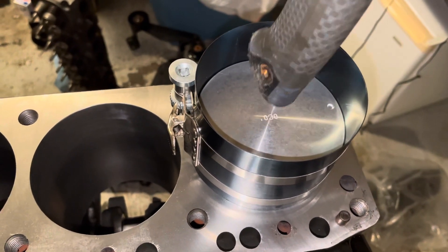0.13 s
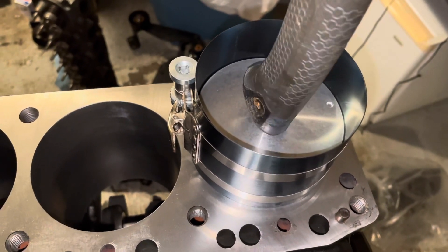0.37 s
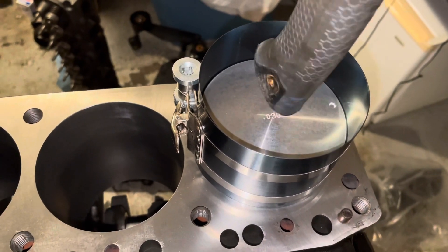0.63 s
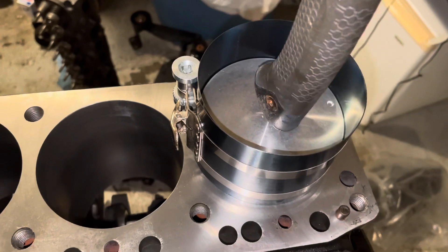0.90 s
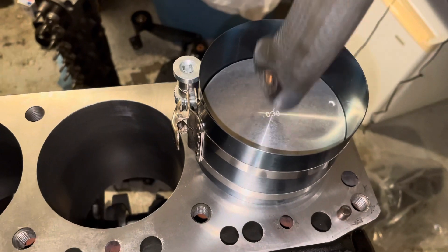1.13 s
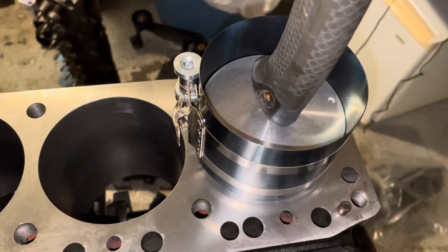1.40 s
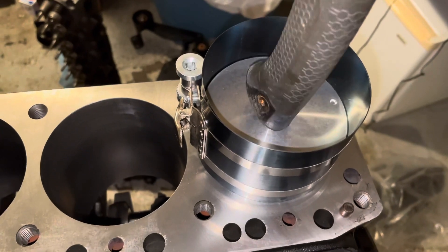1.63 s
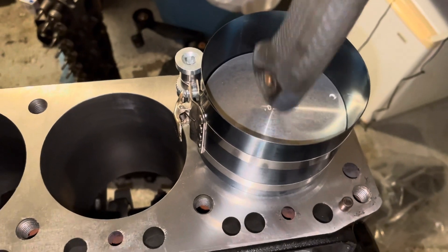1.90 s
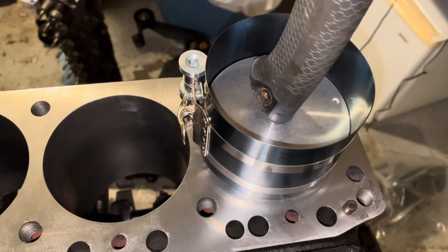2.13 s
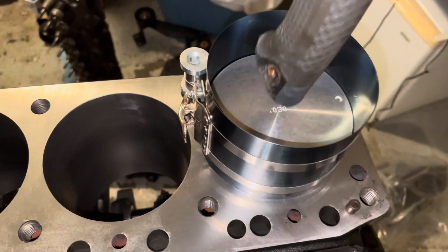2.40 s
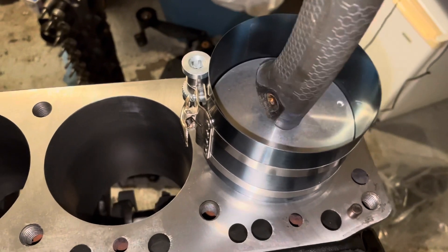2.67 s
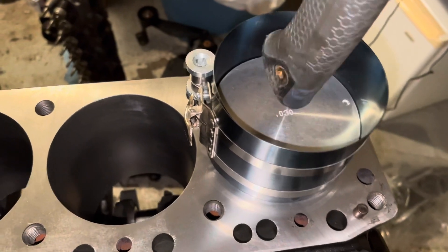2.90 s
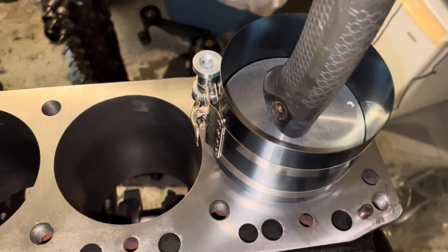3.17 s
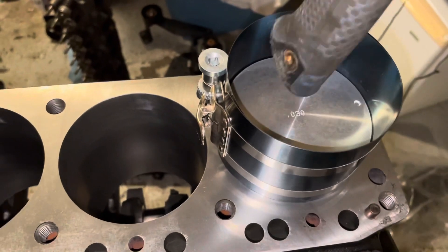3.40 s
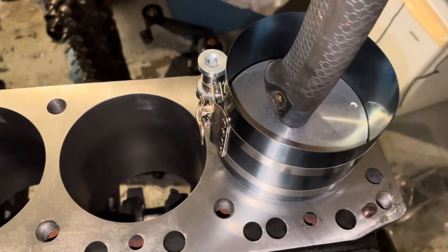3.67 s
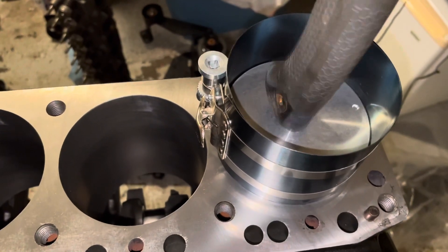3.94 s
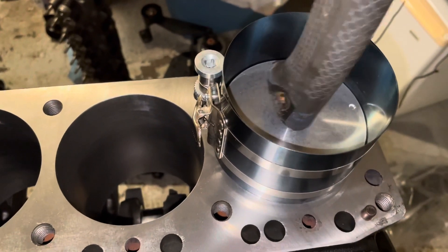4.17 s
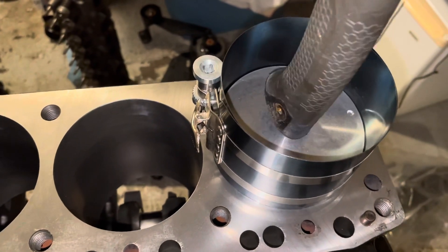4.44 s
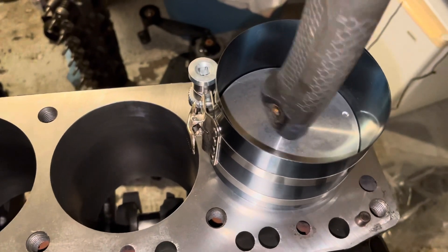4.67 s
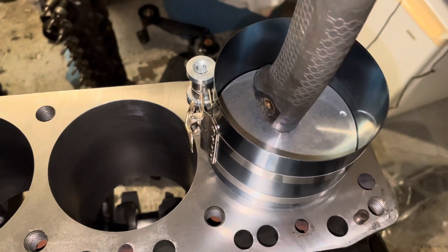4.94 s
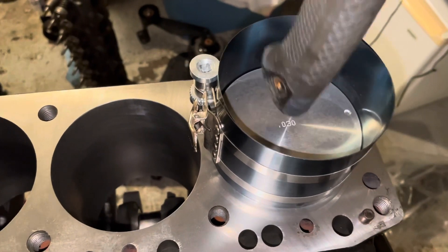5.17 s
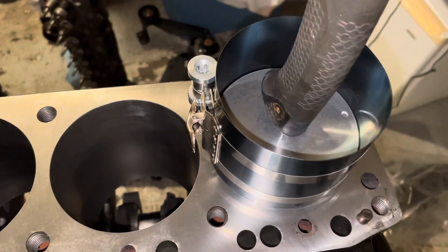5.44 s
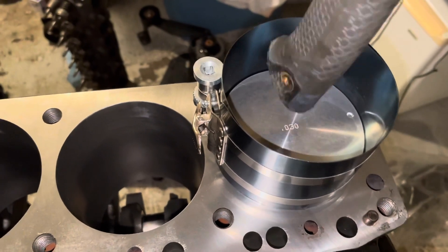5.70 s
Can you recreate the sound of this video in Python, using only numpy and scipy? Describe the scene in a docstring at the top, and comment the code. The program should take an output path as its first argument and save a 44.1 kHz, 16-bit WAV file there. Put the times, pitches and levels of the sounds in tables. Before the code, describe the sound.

Thirteen even, hard metallic clacks about half a second apart, with short scraping rattle, low thud and brief room echo over faint hum.

```python
"""Hard clacks with a gritty rattle and a dull thud just after, repeated in a workshop over a low hum.
A hammer handle taps a piston down through a steel ring sleeve into an engine block, close to a two-port microphone.
Crown, block and casting are damped modes; slipping rings are shaped noise that also rings the sleeve.
Echoes are decaying noise; rumble and air are filtered noise; a faint whine is a blurred gliding sine."""
import sys
import numpy as np
from scipy import signal
from scipy.fft import rfft, irfft, next_fast_len
from scipy.io import wavfile
from scipy.ndimage import uniform_filter1d, map_coordinates

SR = 44100
rng = np.random.default_rng(int(sys.argv[2]) if len(sys.argv) > 2 else 0)


def volts_from_decibels(level):
    """Turn decibel levels (scalar or array-like) into linear amplitude factors."""
    exponent = np.asarray(level, float) / 20
    return 10 ** exponent


def unload_audio(sound):
    """Save the sound as a 16-bit wav file, at the path given as the first command line argument."""
    columns = np.transpose(np.atleast_2d(sound))
    # keep every value between -1 and 1, then stretch to whole-number steps
    steps = np.round(np.clip(columns, -1, 1) * 32767)
    wavfile.write(sys.argv[1], SR, steps.astype(np.int16))


N = 256662


def unit(x):
    """Scale to rms 1."""
    return x / np.sqrt(np.mean(x ** 2) + 1e-20)


def along(points, hz):
    """Interpolate (frequency [Hz], value) points on a log frequency axis."""
    point_hz, value = np.transpose(points)
    return np.interp(np.log(hz + 1), np.log(point_hz + 1), value)


def filtered(x, response):
    """Multiply the spectrum of x by a (complex) response of frequency."""
    size = next_fast_len(x.shape[-1] + 8192)
    spectrum = rfft(x, size) * response(np.fft.rfftfreq(size, 1 / SR))
    return irfft(spectrum, size)[..., :x.shape[-1]]


def spread(pair, alike):
    """Mix two unrelated signals into left and right with a given correlation per frequency."""
    def angle(hz):
        return np.arccos(np.clip(along(alike, hz), -1, 1)) / 2

    mid, side = filtered(pair, lambda hz: np.array([np.cos(angle(hz)), np.sin(angle(hz))]))
    return np.array([mid + side, mid - side])


def wobble(knots_per_s):
    """Smooth random curve: a spline through normal knots."""
    knots = rng.standard_normal(int(N * knots_per_s / SR) + 4)
    return map_coordinates(knots, [np.arange(N) * knots_per_s / SR])


def patchy(spectrum, patchy_db):
    """Stereo noise of rms 1 with slowly moving time-frequency patches of gain."""
    # (frequency [Hz], left-right correlation [-1..1])
    noise_alike = [(60, 0.98), (180, 0.9), (550, 0.56), (1650, 0.029), (4970, 1), (15000, 0.34)]
    z = signal.stft(rng.standard_normal((2, N)), nperseg=1024)[2]
    field = uniform_filter1d(rng.standard_normal(z.shape[1:]), size=8, axis=0)
    field = uniform_filter1d(field, size=8, axis=1)
    pair = signal.istft(z * volts_from_decibels(patchy_db * unit(field)), nperseg=1024)[1][:, :N]
    colored = filtered(pair, lambda hz: volts_from_decibels(along(spectrum, hz)))
    return unit(spread(colored, noise_alike))


def hum():
    """Distant machinery rumbles unevenly and slowly grows; ventilation air fills the room."""
    # ventilation air: (frequency [Hz], relative density [dB/Hz])
    air_spectrum = [(60, -54.5), (130, -9.5), (250, -4), (400, -9), (630, -8.5), (1000, -5.5), (1400, -8),
                    (1750, -5.5), (2100, -12.5), (2600, -23), (4000, -33.5), (6000, -49.5), (9000, -69.5),
                    (16000, -100)]
    # machinery rumble: (frequency [Hz], relative density [dB/Hz])
    rumble_spectrum = [(15, -46.5), (28, -27.5), (40, -9.5), (52, -2), (65, -2), (80, -3.5), (105, -12),
                       (160, -13), (300, -29.5), (500, -70)]
    growth_db_per_s = 0.88
    rumble_db = -55 + growth_db_per_s * np.arange(N) / SR + 2 * wobble(3.9)
    air_db = -59 + 0.75 * wobble(2.5)
    rumble = volts_from_decibels(rumble_db) * patchy(rumble_spectrum, patchy_db=0.5)
    air = volts_from_decibels(air_db) * patchy(air_spectrum, patchy_db=0.5)
    return (rumble + air) * volts_from_decibels([[.8], [-.8]])  # left 1.6 dB up on right


def whine():
    """A faint far-off tone, blurred by phase drift, that dips, glides up and fades."""
    start_s, fade_s, length_s, turn_s = .33, .07, .4, .14  # turn counts from the start
    lowest_hz, glide_hz_per_s, blur_hz, gain_db = 3150, 1800, 150, -73.5
    t = np.arange(N) / SR - start_s
    drift = np.cumsum(rng.standard_normal((2, N)), axis=1) * np.sqrt(2 * np.pi * blur_hz / SR)
    glide_hz = lowest_hz + glide_hz_per_s * np.abs(t - turn_s)
    tone = np.sin(2 * np.pi * np.cumsum(glide_hz) / SR + drift)
    fade = np.clip(np.minimum(t, length_s - t) / fade_s, 0, 1) ** 2
    return filtered(tone, lambda hz: np.exp(-((hz - 3300) / 400) ** 2)) * volts_from_decibels(gain_db) * fade


def tail(t60s, levels, onset_s):
    """Stereo echo tail: noise dying at its own speed per frequency, the treble falling ever faster."""
    # (frequency [Hz], extra loss after fall_s [dB])
    extra_fall = [(500, 0), (1100, 2), (3000, 4), (7000, 8)]
    fall_s = .3
    hz, t, z = signal.stft(rng.standard_normal((2, SR // 2)), SR, nperseg=256)
    decay_db = -60 * t / along(t60s, hz)[:, None]
    extra_db = along(extra_fall, hz)[:, None] * (t / fall_s) ** 2
    noise = signal.istft(z * volts_from_decibels(decay_db - extra_db), SR, nperseg=256)[1]
    noise = noise * (1 - np.exp(-(np.arange(noise.shape[1]) / SR / onset_s) ** 2))
    return filtered(noise / np.linalg.norm(noise[0]), lambda hz: volts_from_decibels(along(levels, hz)))


def workshop():
    """One random echo pattern: near benches plus far walls, as two decaying noise tails."""
    # decay before the extra fall: (frequency [Hz], t60 [s])
    # the near point at 1100 Hz lies between STFT bins; the bins beside it die almost at once
    near_t60 = [(80, 0.33), (300, 0.61), (1100, -0.03), (3000, 0.3748), (10000, 0.28)]
    far_t60 = [(60, .25), (160, 0.79), (420, 0.44), (1100, 0.55), (2900, 0.5), (7700, 0.64), (13000, 0.4)]
    # (frequency [Hz], relative level [dB])
    near_db = [(60, -28.5), (150, -8), (330, -1), (520, -23), (800, -9), (1150, -14.5), (1700, -14),
               (2200, -14.5), (3000, -22.5), (4800, -21.5), (7000, -27.5), (11000, -36.5), (14500, -40)]
    far_db = [(60, -22.5), (150, -11), (330, 2.5), (520, -3.5), (800, -5.5), (1150, -2.5), (1700, -8.5),
              (2200, -9), (3000, -16.5), (4800, -25.5), (7000, -29.5), (11000, -32.5), (14500, -44)]
    # (frequency [Hz], left-right correlation [-1..1])
    echo_alike = [(60, .85), (130, 0.51), (290, 0.5), (640, .05), (1400, 0.096), (3100, 0.71), (6000, 0.45),
                  (12000, 0.62)]
    near = tail(near_t60, near_db, onset_s=0.002)
    far = tail(far_t60, far_db, onset_s=0.0046)
    return spread(near + far, echo_alike)


def tilt(db_per_octave):
    """Treble slope over the two octaves above 3500 Hz, level beyond."""
    return [(3500, 0), (14000, 2 * db_per_octave)]


def leaned(modes, rim_db):
    """Drive the crown rim's modes, those above 1900 Hz, harder or softer than the rest."""
    return [(hz, db + rim_db * (hz > 1900), *rest) for hz, db, *rest in modes]


def ring(modes, t, attack_s, scatter_db, detune, blur=0):
    """Damped modes set off at t = 0, varied per call; blur is phase-drift linewidth as a share of frequency."""
    t = np.maximum(t, 0)
    hz, db, t60, swing = np.transpose(modes)[:, :, None]
    level_chance, pitch_chance = rng.standard_normal((2, len(modes), 1))
    drift = np.cumsum(rng.standard_normal((len(modes), len(t))), axis=1)
    drift = drift * np.sqrt(2 * np.pi * blur * hz / SR)
    envelope = swing * volts_from_decibels(db + scatter_db * level_chance - 60 * t / t60)
    waves = envelope * np.sin(2 * np.pi * hz * (1 + detune * pitch_chance) * t + drift)
    return waves.sum(0) * (1 - np.exp(-t / attack_s))


def casting_hum(t, rim_db):
    """Bore air and casting modes hum on after the blow, blurred by phase drift."""
    # (frequency [Hz], level [dB], t60 [s], first swing [signed factor])
    casting_modes = [(258, -29, .25, 1), (305, -28, .32, -1), (353, -25, .36, 1), (388, -27, .22, -1),
                     (645, -34, .12, 1), (730, -34, .2, 1), (810, -33, .15, -1), (915, -38, .35, -1),
                     (1045, -35, .3, 1), (1135, -32, .15, -1), (1335, -37, .3, 1), (1534, -35, .3, -1),
                     (2170, -38, .15, 1), (2370, -42, .25, -1), (3560, -47, .42, 1), (4900, -51, .35, -1)]
    return ring(leaned(casting_modes, rim_db), t, .004, scatter_db=2.5, detune=.006, blur=.012)


def block_thud(t):
    """Engine block and stand modes, set off late because the push takes time to reach the block."""
    # (frequency [Hz], level [dB], t60 [s], first swing [signed factor])
    block_modes = [(69, -24.5, 0.17, 0.78), (88.7, -24, 0.12, 0.98), (143.5, -14, 0.062, -1.34),
                   (266.7, -6, 0.045, 0.86), (369, -6, 0.024, -0.84)]
    delay_s = .0024
    return ring(block_modes, t - delay_s, .0002, scatter_db=1, detune=.015)


def chatter(t, peak_s, life_s, tilt_db):
    """Rings slip in the sleeve: gritty noise swells, dies and sets the steel modes ringing."""
    # hiss of slipping rings: (frequency [Hz], relative density [dB/Hz])
    slip_spectrum = [(1200, -30), (2500, -3), (4500, 0), (7000, -2), (8500, -4), (11000, -5), (13000, -10),
                     (14300, -17), (15500, -8), (16500, -10), (17200, -60)]
    # steel sleeve: (frequency [Hz], level [dB], t60 [s])
    sleeve_modes = [(2190, -2, .04), (2850, -13, .035), (3525, -9, .035), (4210, -11, .03),
                    (4800, -11, .035), (5880, -15, .025), (6750, -13, .018), (11000, -13, .012)]
    u = t / peak_s
    swell = (u * np.exp(1 - u)) ** 2 + .5 * np.exp(-t / life_s)
    roughness = uniform_filter1d(rng.standard_normal(len(t)), size=9)
    grit = rng.standard_normal(len(t)) * volts_from_decibels(14 * roughness)
    hiss = unit(filtered(grit, lambda hz: volts_from_decibels(along(slip_spectrum, hz)))) * swell
    steel = sum(volts_from_decibels(db - 60 * t / t60) * np.sin(2 * np.pi * hz * t) for hz, db, t60 in sleeve_modes)
    burst = hiss + volts_from_decibels(-25.5) * signal.fftconvolve(grit * swell, steel)[:len(t)]
    return filtered(burst, lambda hz: volts_from_decibels(along(tilt(tilt_db), hz)))


def crown_clack(t, rim_db):
    """Piston crown modes struck by the handle."""
    # (frequency [Hz], level [dB], t60 [s], first swing [signed factor])
    crown_modes = [(782, -5, 0.011, -0.94), (1160, -7, 0.019, 1), (1325, 1.5, 0.0069, 0.99),
                   (2201, -8, 0.0088, -1.23), (1506, -18, .04, 0.52)]
    return ring(leaned(crown_modes, rim_db), t, .0009, scatter_db=1.5, detune=.02)


def knocks():
    """Every blow, direct and echoed; echoes are partly the same each time, as hand and hammer shift."""
    # blows; off-centre ones ring the crown rim more:
    # (time [s], strength [dB], chatter [dB], brightness [dB/octave], crown rim [dB])
    blows = [(.1390, -1.5, -25.5, -3, 3), (0.6403, 0, -23, -2.5, -4), (1.096, 0, -19.5, -3.5, 3),
             (1.5524, 1, -22.5, -0.9, -2), (2.0099, 0.5, -19.5, 0.6, 4.5), (2.4610, 0, -20.5, -0.5, 1.5),
             (2.9179, 0.5, -19, -1.7, 1.5), (3.4011, 1, -19.5, -0.55, 2), (3.862, 1, -25, 3.06, -1.5),
             (4.3455, 1, -22.5, 1.15, -1.5), (4.8119, 0, -25, 2.5, -4), (5.244, 1, -22, 4, -4.5),
             (5.7136, -1, -19, -5, 3)]
    # loose ticks of the sleeve: (time [s], level [dB])
    ticks = [(5.2562, -11)]
    # single strong echoes of the clack off nearby faces: (mean delay [ms], left [dB], right [dB])
    faces = [(4.4, -10.5, -12), (7.7, -6, -18), (11.5, -22.5, -17.5), (19.3, -15, -18.5)]
    # the block takes less of the blow until the rings grip the bore
    loose_db, grip_s, grip_spread_s = -3.5, 1.4, .3
    slip_peak_s, slip_scatter = .0026, 0.1  # scatter in log time
    same = 0.41  # power share of the echo pattern common to all blows
    out = np.zeros((2, N + SR))
    t = np.arange(SR // 2) / SR
    walls = workshop()

    for s, db in ticks:
        out[:, round(s * SR):][:, :len(t)] += volts_from_decibels(db) * chatter(t, .0003, .0006, 1.5)

    for s, clack_db, chatter_db, tilt_db, rim_db in blows:
        thud_db = clack_db + loose_db / (1 + np.exp((s - grip_s) / grip_spread_s))
        peak_s = slip_peak_s * np.exp(slip_scatter * rng.standard_normal())
        clack = volts_from_decibels(clack_db) * crown_clack(t, rim_db)
        thud = volts_from_decibels(thud_db) * block_thud(t)
        after = volts_from_decibels(thud_db) * casting_hum(t, rim_db)
        slip = volts_from_decibels(chatter_db) * chatter(t, peak_s, .004, tilt_db)
        direct = clack + thud + after + slip

        # the walls answer each range as strongly as its source was driven
        drive = [(400, thud_db), (700, clack_db), (1800, clack_db),
                 (2200, clack_db + rim_db / 2), (3200, chatter_db + 24)]
        echoes = np.sqrt(same) * walls + np.sqrt(1 - same) * workshop()
        echoes = filtered(echoes, lambda hz: volts_from_decibels(along(drive, hz) + along(tilt(tilt_db), hz)))

        for ms, left_db, right_db in faces:
            late = round((s + (ms + rng.normal(0, 0.27)) / 1000) * SR)
            out[:, late:late + len(t)] += volts_from_decibels([[left_db], [right_db]]) * clack
        out[:, round(s * SR):][:, :len(t)] += direct + volts_from_decibels(16) * echoes[:, :len(t)]
    return out[:, :N]


def ports(x):
    """Two ports facing the blow: left louder in the mids, right slightly in deep bass and near 9 kHz; phase differs."""
    # (frequency [Hz], left minus right [dB])
    balance = [(60, -2), (110, -1.5), (200, 1), (380, 2.5), (850, 4.5), (1600, 4.5), (2000, 1), (2800, 0.5),
               (3500, 4), (5000, 4.5), (7000, 3), (9300, -1.5), (15000, 0)]
    # (frequency [Hz], phase of left minus right [rad])
    phase = [(300, 0), (690, .4), (1460, -.5), (3010, .7), (4220, .2), (5080, .6), (6460, -.8),
             (7670, -2.8), (8870, -3.4), (10500, -5.9), (12800, -6.6), (14000, -9.3), (16400, -9.5)]
    half = np.array([[.5], [-.5]])
    return filtered(x, lambda hz: volts_from_decibels(half * along(balance, hz)) * np.exp(1j * half * along(phase, hz)))


def scene():
    """Knocks through the ports, over the hum and the whine."""
    return ports(knocks()) + hum() + whine()


def top_cut(x):
    """Nothing passes above the cut-off."""
    return signal.sosfilt(signal.butter(12, 16800, fs=SR, output="sos"), x)


def record(dry):
    """The microphone loses the deepest bass, and peaks round off near full scale."""
    lean = signal.sosfilt(signal.butter(2, 45, "high", fs=SR, output="sos"), dry)
    soft = lean / (1 + np.abs(lean / 1.1) ** 4) ** (1 / 4)
    return top_cut(soft)


dry = scene()
out = record(dry)
unload_audio(out)
```